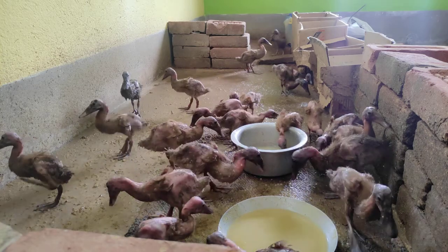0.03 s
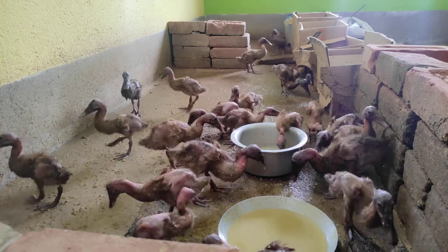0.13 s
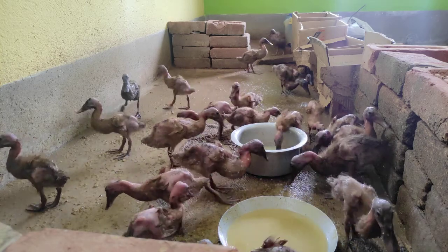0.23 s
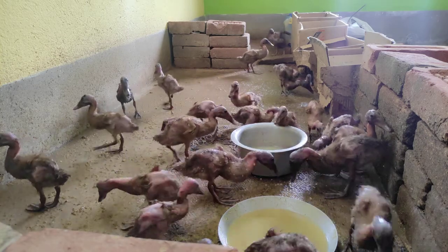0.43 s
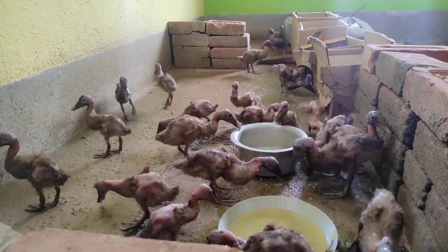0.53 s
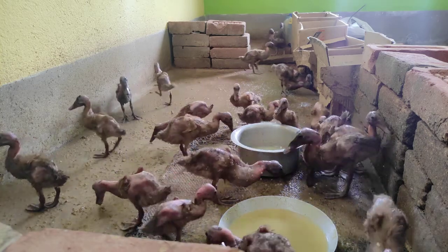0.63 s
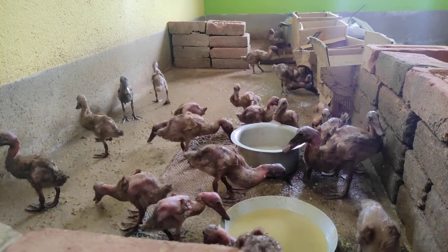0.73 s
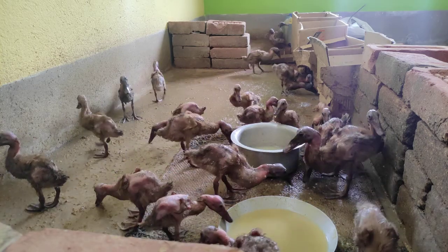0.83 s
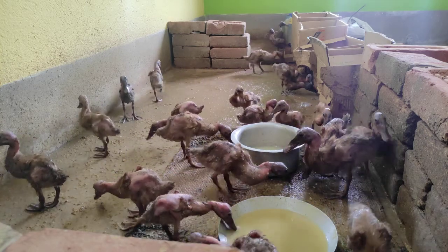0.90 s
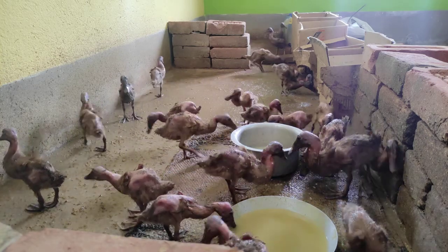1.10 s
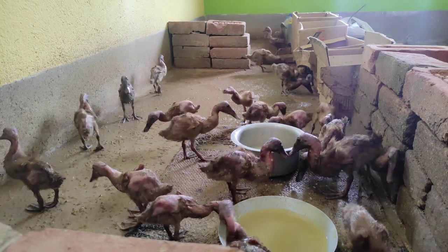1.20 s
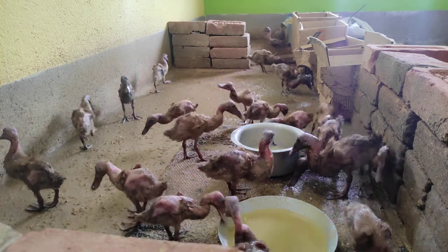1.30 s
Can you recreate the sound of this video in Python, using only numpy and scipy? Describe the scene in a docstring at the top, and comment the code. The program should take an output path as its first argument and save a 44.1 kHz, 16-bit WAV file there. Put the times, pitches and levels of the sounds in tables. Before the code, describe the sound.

Ducklings peep in a brick pen with a slight echo. Thin distant peeps and a small splash come first, then two close peeps, one soft and one loud, amid wet pattering, bill clicks and low room noise.

```python
"""Two ducklings peep close to a stereo microphone, each with both sides of its syrinx.
The place is a bare brick and plaster pen; farther off others answer, mostly higher, and the rest of
the flock blurs into a wash. Bills click, peck and splash in the water bowls, wet feet and wings patter
and flap, and the hard walls ring over a low steady noise."""
import sys
import numpy as np
from scipy import signal
from scipy.fft import rfft, irfft
from scipy.io import wavfile
from scipy.ndimage import uniform_filter1d

SR = 44100
rng = np.random.default_rng(int(sys.argv[2]) if len(sys.argv) > 2 else 0)


def persist_wave(psi):
    """Save psi, clipped to +-1, as 16-bit WAV."""
    counts = np.round(np.clip(psi, -1, 1) * 32767).astype(np.int16)
    wavfile.write(sys.argv[1], SR, np.atleast_2d(counts).T)


N = 59535
TIME = np.arange(N) / SR

# The two close peeps, soft then loud. Each row: time in seconds, pitch in Hz, level in dB.
SOFT_PEEP = [(.548, 1769, -52), (.562, 2083, -49.5), (.591, 2240, -52), (.597, 2304, -33.5),
             (.606, 2372, -37), (.617, 2278, -36), (.628, 1958, -44), (.64, 1755, -59)]
LOUD_PEEP = [(.793, 1650, -52.5), (.8, 1954, -53), (.804, 2137, -43), (.818, 2512, -40),
             (.828, 2665, -38.5), (.833, 2614, -28.5), (.85, 2571, -26.5), (.865, 2597, -26),
             (.876, 2574, -26.5), (.886, 2337, -31), (.897, 1854, -49)]
# Thin peeps from farther off. Each row: start and length in seconds, starting and final pitch in Hz,
# level in dB, pan (left over right) in dB, roughness (0 is clear, 1 or more all hoarse).
FAR_PEEPS = [(-.005, 0.067, 4260, 4166, -48, 6, 0.38), (0, 0.036, 2410, 2188, -47.5, 2, 1.2),
             (.124, 0.068, 3940, 3780, -46, 4, 0.97), (.146, 0.063, 3105, 2867, -46.5, -4, 0.75),
             (0.473, 0.092, 3927, 3633, -44, -8.5, 1), (.474, .1, 3375, 2930, -45.5, -2, 0.95),
             (0.576, 0.051, 1887, 1965, -52.5, 20, 0.83), (0.959, 0.052, 4110, 4030, -52.5, -6, 0.1),
             (1.021, 0.0595, 4080, 3952, -43.5, -2, .45), (1.052, .055, 3135, 2905, -47.5, 3, 0.3),
             (1.227, 0.061, 4030, 3803, -46.5, 3.5, 0.68), (1.264, 0.034, 3047, 2957, -41, -5, .25),
             (1.317, .06, 2986, 2935, -46, -6, 0.37)]
# Wet smacks of bills and feet. Each row: start and decay in seconds, level and pan in dB.
CLICKS = [(0.1312, 0.0052, -51, -6), (0.2164, 0.0092, -33, 1.5), (.226, 0.088, -48, -1),
          (0.4833, 0.014, -52.5, -1), (0.57, 0.0038, -49, 9), (0.647, 0.0043, -64, -3),
          (1.0294, 0.0065, -45, -1), (1.068, 0.0017, -44, -9), (1.1524, 0.0046, -43, 2),
          (1.1884, 0.015, -49.5, -7), (1.293, 0.0043, -47.5, -4)]
# Pecks on the basin. Each row: start in seconds, pitch in Hz, level in dB.
PECKS = [(.292, 874, -44.5), (.312, 780, -47), (1.029, 937, -41.5), (1.064, 862, -47)]
# The basin's modes. Each row: multiple of the pitch, relative level in dB, seconds to fall 60 dB.
BASIN_MODES = [(1.001, -1.5, 0.061), (1.37, -14, 0.11)]
# The metal bowl's modes. Each row: frequency in Hz, level in dB.
BOWL_MODES = [(4556, -39), (5590, -44)]
# Bursts of movement about the pen. Each row: start, rise and decay in seconds, level and pan in dB.
SPLASHES = [(.208, 0.0077, 0.16, -46.5, -3), (.272, 0.013, 0.075, -38, 0.5), (.94, 0.015, 0.11, -50, -3),
            (1.025, 0.026, 0.04, -48.5, -4)]
KNOCKS = [(.286, 0.0077, 0.058, -47.5, -2), (.46, 0.0033, 0.061, -51.5, -5), (.84, 0.012, 0.13, -55, -1),
          (1.029, 0.0016, 0.046, -49.5, -2), (1.17, 0.0098, 0.097, -51, 0.5), (1.26, 0.02, 0.074, -54.5, 0)]
FLAPS = [(.01, 0.061, 0.14, -53.5, 6.5), (.202, 0.0068, 0.0063, -43, -2.5),
         (.24, 0.013, 0.059, -52.5, -2.5), (.58, 0.015, 0.04, -58.5, 1), (1.205, 0.015, 0.057, -47, -1),
         (1.31, 0.03, 0.041, -54.5, 3)]
# The spectrum of each noisy sound. Each row: frequency in Hz, relative level in dB.
RASP_COLOUR = [(1500, -2.5), (2300, 12), (3700, -7), (5600, -3), (8000, 1), (10000, -14), (12000, -14),
               (15500, -26)]
FLOCK_COLOUR = [(1200, -22.5), (2200, -2), (2650, 1.5), (3200, -2.5), (5000, -36)]
SPLASH_COLOUR = [(600, -54), (1200, 0), (1800, -7.5), (2700, -2.5), (3700, 2), (4700, 5.5), (6000, 3),
                 (8000, -8.5), (11000, -19.5), (15500, -36)]
CLICK_COLOUR = [(1000, -11), (3000, -22), (5600, -5.5), (6400, 5.5), (7200, 1), (8500, 1), (11000, -8.5),
                (15500, -23.5)]
PATTER_COLOUR = [(700, -13), (1500, -18), (2700, 12), (4500, 4.5), (7000, -1.5), (10000, -11.5),
                 (15500, -24.5)]
KNOCK_COLOUR = [(400, -11), (680, -5), (830, 3.5), (1000, -1.5), (1250, -1), (1500, -6), (2000, -26)]
FLAP_COLOUR = [(70, -21), (130, -30), (185, 3), (250, -1.5), (340, 8), (450, -7), (700, -47)]
ROOM_TONE_COLOUR = [(25, -4.5), (100, -3.5), (200, -4.5), (320, -3.5), (600, -11), (800, -8.5), (1500, -11),
                    (2800, -12), (4000, -20), (6200, -28.5), (9000, -23.5), (15500, -44.5)]
RUMBLE_COLOUR = [(25, -17), (50, 0.5), (72, 4), (120, 5), (200, -20), (400, -51)]
# How the running sounds swell and fade. Each row: time in seconds, level in dB.
FLOCK_LEVEL = [(0, -55.5), (.28, -50), (.45, -69), (.5, -51.5), (.78, -60.5), (1.1, -54.5), (1.23, -59.5),
               (1.28, -55), (1.35, -67)]
PATTER_LEVEL = [(0, -53.5), (.17, -55), (.42, -69), (.5, -68), (.65, -46), (.73, -99), (.8, -55),
                (.97, -51), (1.08, -68), (1.13, -57), (1.2, -55), (1.35, -53)]
ROOM_TONE_LEVEL = [(0, -52), (.42, -53.5), (.6, -53.5), (.77, -56), (.95, -53.5), (1.35, -52.5)]
RUMBLE_LEVEL = [(0, -59.5), (.35, -67), (.62, -60), (.74, -63), (.9, -63.5), (1.05, -62), (1.16, -50),
                (1.25, -57.5), (1.35, -49)]
HUM_LEVEL = [(0, -59.5), (.08, -51.5), (.2, -58.5), (.3, -72.5), (.52, -70), (.6, -58.5), (.75, -65),
             (.85, -76.5)]
# Diffuse sound at the microphone. Each row: frequency in Hz, correlation of left and right.
STEREO_LIKENESS = [(40, 0.42), (120, 0.55), (300, 0.86), (700, 0.06), (1500, 0.031), (12000, 0.022)]
# The ring of the pen. Each row: frequency in Hz, seconds to fall 60 dB.
PEN_T60 = [(200, 0.33), (1000, 0.44), (2400, 0.54), (3400, 0.48), (6000, 0.6), (14000, 0.29)]


def near_peep(curve, ratio, waver, hoarse, upper_db, octave_db, third_db, sums_db, rasp_db,
              upper_pan_db, wet_db, upper_wet_db, echo_db):
    """A close, arched whistle, hoarse while weak; with effort the syrinx's other side joins higher."""
    s, hz, db = np.transpose(curve)
    pitch = uniform_filter1d(np.interp(TIME, s, hz), size=220)
    gain = uniform_filter1d(from_db(np.interp(TIME, s, db, left=-120, right=-120)), size=130)
    effort = (gain / gain.max()) ** 2.7
    low = wavering_phase(pitch, waver, 234)
    high = wavering_phase(pitch * ratio, waver, 190) + 0.16 * drift(170)
    whistle = np.sin(low + hoarse * (1 - effort) * drift(135))
    harmonics = from_db(octave_db) * np.sin(2 * low)
    harmonics += from_db(third_db) * (np.sin(3 * low) + from_db(-13) * np.sin(4 * low))
    sum_tones = np.sin(low + high) + from_db(-15) * np.sin(2 * low + high)
    high_harmonics = from_db(-13) * np.sin(2 * high) + from_db(-14.5) * np.sin(3 * high)
    overtones = (harmonics + from_db(sums_db) * (sum_tones + high_harmonics)) * (1 + 0.22 * drift(180))
    rasp = from_db(rasp_db) * diffuse_noise(RASP_COLOUR)
    upper = gain * (effort * (from_db(upper_db) * np.sin(high) + overtones) + rasp) * panned(upper_pan_db)
    far_wall_s = .072  # the far wall throws the upper voice back
    echo = from_db(echo_db) * np.array([np.interp(TIME - far_wall_s, TIME, side) for side in upper])
    return np.sqrt(2) * (pen(gain * whistle[None], wet_db) + pen(upper, upper_wet_db) + echo)


def far_peeps():
    """Short whistles from farther off, most sagging in pitch, part clear tone and part hoarse flutter."""
    attack_s, release_s, flutter_hz, octave_db = 0.0098, 0.06, 170, -21.5
    out = 0
    for s, length, start_hz, end_hz, db, pan, rough in FAR_PEEPS:
        phase = 2 * np.pi * np.cumsum(np.interp(TIME, [s, s + length], [start_hz, end_hz])) / SR
        hoarse = (drift(flutter_hz) * np.sin(phase) + drift(flutter_hz) * np.cos(phase)) / np.sqrt(2)
        share = np.clip(rough, 0, 1)
        voice = np.sqrt(1 - share) * np.sin(phase) + np.sqrt(share) * hoarse
        voice += from_db(octave_db) * np.sin(2 * phase)
        gain = np.clip((TIME - s) / attack_s, 0, 1) * np.clip((s + length - TIME) / release_s + .5, 0, 1)
        out = out + panned(pan) * from_db(db) * gain * voice
    return out


def trill():
    """A high whistle in three quick pulses, swelling and turning hoarse as it sags."""
    start_s, length_s, pulses_per_s = .399, .073, 40.2
    start_hz, sag_hz_per_s, swell_db_per_s = 3955, 1090, 85
    age = np.clip(TIME - start_s, 0, length_s)
    pulses = np.abs(np.sin(np.pi * pulses_per_s * age)) * (age < length_s)
    phase = wavering_phase(start_hz - sag_hz_per_s * age, 0.0053, 172)
    hoarse = 0.46 * (age / length_s) ** 2 * drift(200)
    return from_db(-39.5 + swell_db_per_s * age) * pulses * np.sin(phase + hoarse) * panned(-1.4)


def splashes():
    """Showers of droplets over fine spray; the metal bowl rings in the biggest splash."""
    drops = impacts(per_s=1100, spread_db=1.5, colour=SPLASH_COLOUR)
    spray = from_db(-7.5) * diffuse_noise(SPLASH_COLOUR)
    ring_at_s, rise_s, decay_s, pan_db = .283, .02, .022, -8
    ring = sum(bursts([(ring_at_s, rise_s, decay_s, db, pan_db)]) * np.sin(2 * np.pi * hz * TIME)
               for hz, db in BOWL_MODES)
    return rms_one(drops + spray) * bursts(SPLASHES) + ring


def clicks():
    """Wet bills and feet smack: bright noise with a sharp onset."""
    rise_s = 0.00028
    return diffuse_noise(CLICK_COLOUR) * bursts([(s, rise_s, *rest) for s, *rest in CLICKS])


def patter():
    """Wet feet and dabbling bills make a run of tiny impacts."""
    return impacts(per_s=660, spread_db=1, colour=PATTER_COLOUR) * level_curve(PATTER_LEVEL)


def pecks():
    """Each peck of a bill sets the low modes of the basin ringing briefly."""
    out = 0
    for s, hz, db in PECKS:
        age = np.maximum(TIME - s, 0)
        for multiple, mode_db, t60 in BASIN_MODES:
            out = out + from_db(db + mode_db - 60 * age / t60) * np.sin(2 * np.pi * hz * multiple * age)
    return out * panned(-2.2)


def knocks():
    """Knocks on a bowl: hollow bursts of midrange noise."""
    return diffuse_noise(KNOCK_COLOUR) * bursts(KNOCKS)


def flaps():
    """Wings and footfalls: soft bursts of low noise."""
    return diffuse_noise(FLAP_COLOUR) * bursts(FLAPS)


def flock():
    """The rest of the flock reaches the microphone blurred into a wash by the room."""
    return diffuse_noise(FLOCK_COLOUR) * level_curve(FLOCK_LEVEL)


def room_tone():
    """Steady low noise, an uneven rumble, and a faint hum with its octave that comes and goes."""
    steady = diffuse_noise(ROOM_TONE_COLOUR) * level_curve(ROOM_TONE_LEVEL)
    rumble = diffuse_noise(RUMBLE_COLOUR) * level_curve(RUMBLE_LEVEL)
    phase = wavering_phase(hz=189.7, waver=0.009, rate_hz=15)
    hum = level_curve(HUM_LEVEL) * (np.sin(phase) + from_db(-5) * np.sin(2 * phase))
    return steady + rumble + hum


def pen(x, wet_db):
    """Add the dense echo of the hard walls; each half-octave dies at its own rate."""
    gap_s, build_s = 0.0037, 0.0072
    edges_hz = 90 * 2 ** np.arange(0, 8, .5)
    white, hz = rfft(rng.standard_normal((2, N))), np.fft.rfftfreq(N, 1 / SR)
    tail = 0
    for low, high in zip(edges_hz, edges_hz[1:]):
        band = irfft(white * ((hz >= low) & (hz < high)), N)
        tail = tail + band * from_db(-60 * TIME / at_hz(PEN_T60, np.sqrt(low * high)))
    tail = rms_one(tail * np.clip((TIME - gap_s) / build_s, 0, 1)) / np.sqrt(N)
    return x + from_db(wet_db) * signal.fftconvolve(x.mean(0)[None], tail, axes=1)[:, :N]


def diffuse_noise(colour):
    """Noise from all round the microphone, alike on both sides only in the bass."""
    mid, side = rfft(rng.standard_normal((2, N)))
    alike = at_hz(STEREO_LIKENESS, np.fft.rfftfreq(N, 1 / SR))
    return coloured(irfft(np.sqrt(1 + alike) * mid + np.sqrt(1 - alike) * side * [[1], [-1]], N), colour)


def impacts(per_s, spread_db, colour):
    """Random tiny impacts of uneven size; unit power."""
    sizes = rng.choice([-1, 1], (2, N)) * from_db(spread_db * np.minimum(rng.exponential(1, (2, N)), 4))
    return coloured((rng.random((2, N)) < per_s / SR) * sizes, colour)


def bursts(rows):
    """Stereo envelope of events that rise and die away."""
    power = 0
    for s, rise, decay, db, pan in rows:
        shape = np.clip((TIME - s) / rise, 0, 1) * np.exp(-np.maximum(TIME - s - rise, 0) / decay)
        power = power + (panned(pan) * from_db(db) * shape) ** 2
    return np.sqrt(power)


def wavering_phase(hz, waver, rate_hz):
    """Phase of a slightly unsteady tone."""
    return 2 * np.pi * np.cumsum(hz * (1 + waver * drift(rate_hz))) / SR


def drift(rate_hz):
    """Random wander of spread 1, mostly slower than rate_hz."""
    hz = np.fft.rfftfreq(N, 1 / SR)
    return rms_one(irfft(rfft(rng.standard_normal(N)) / (1 + (hz / rate_hz) ** 2), N))


def coloured(x, colour):
    """Give a steady signal a spectrum; unit power."""
    return rms_one(irfft(rfft(x) * from_db(at_hz(colour, np.fft.rfftfreq(N, 1 / SR))), N))


def at_hz(points, hz):
    """Read a table on a log-frequency axis."""
    f, value = np.transpose(points)
    return np.interp(np.log(np.maximum(hz, 1)), np.log(f), value)


def level_curve(points):
    """Gain over time from rows of seconds and dB."""
    return from_db(np.interp(TIME, *np.transpose(points)))


def panned(db):
    """Left and right gains, the left louder by db."""
    return from_db(np.array([[db], [-db]]) / 2)


def from_db(db):
    """Decibels to gain."""
    return 10 ** (np.asarray(db) / 20)


def rms_one(x):
    """Scale to unit power."""
    return x / np.sqrt(np.mean(x ** 2) + 1e-20)


def scene():
    """The pen from the microphone: voices near and far, water and movement, room tone behind."""
    loud = near_peep(LOUD_PEEP, ratio=1.256, waver=0.0031, hoarse=0.31,
                     upper_db=-12, octave_db=-25, third_db=-33, sums_db=-27, rasp_db=-26.5,
                     upper_pan_db=-5.5, wet_db=-5.5, upper_wet_db=-0.5, echo_db=-5.5)
    soft = near_peep(SOFT_PEEP, ratio=1.2, waver=0.01514, hoarse=1.23,
                     upper_db=-7.5, octave_db=-35, third_db=-25, sums_db=-25, rasp_db=-41,
                     upper_pan_db=-14, wet_db=-1, upper_wet_db=-17, echo_db=-9)
    near = loud * panned(-.6) + soft * panned(4.3)
    answers = pen(far_peeps(), wet_db=-2) + pen(trill(), wet_db=-3)
    dabbling = patter()
    water = pen(splashes(), wet_db=-10) + pen(clicks(), wet_db=-2) + pen(dabbling, wet_db=-4.5)
    movement = pen(pecks(), wet_db=-12) + knocks() + flaps()
    return near + answers + water + movement + room_tone() + flock()


def record(dry):
    """The highest treble is cut steeply."""
    stopband_hz = 16300
    return signal.sosfilt(signal.cheby2(16, 70, stopband_hz, fs=SR, output="sos"), dry)


dry = scene()
out = record(dry)
persist_wave(out)
```